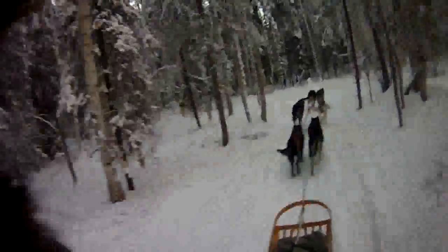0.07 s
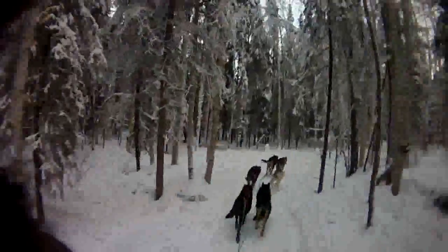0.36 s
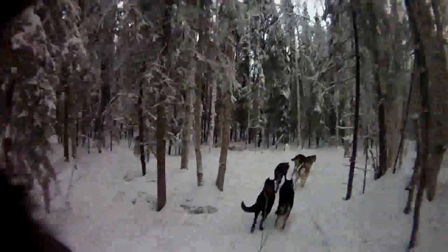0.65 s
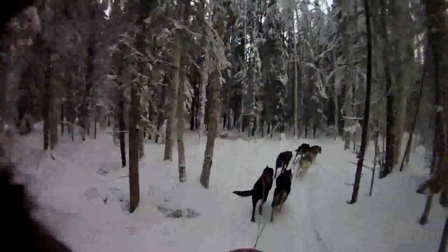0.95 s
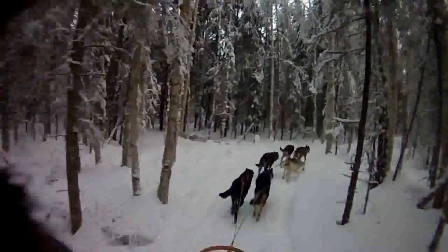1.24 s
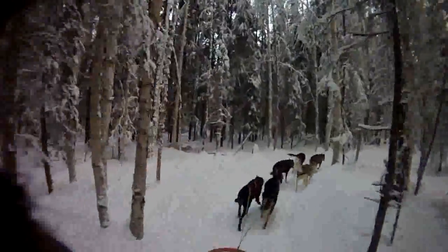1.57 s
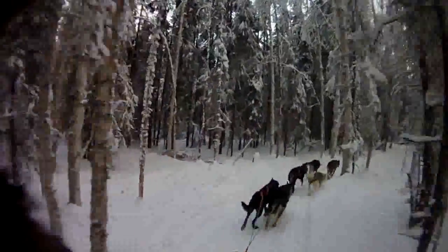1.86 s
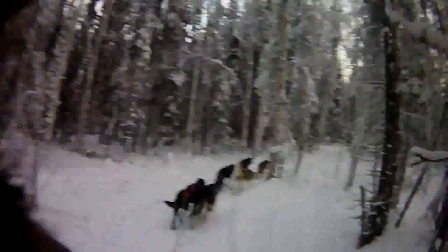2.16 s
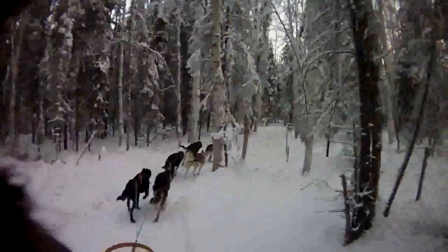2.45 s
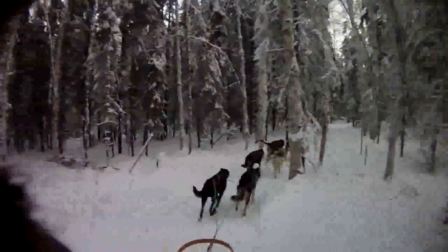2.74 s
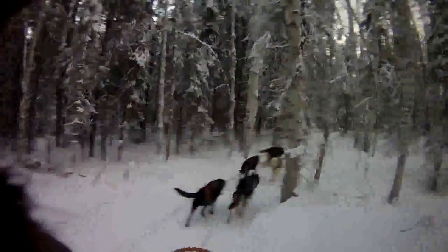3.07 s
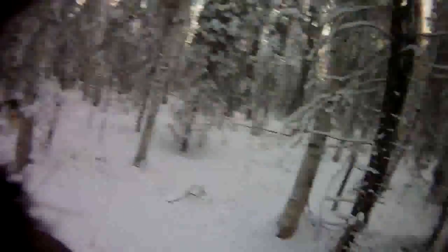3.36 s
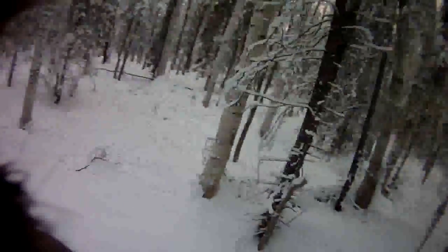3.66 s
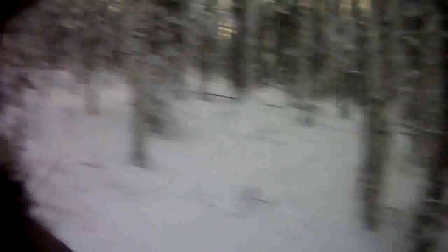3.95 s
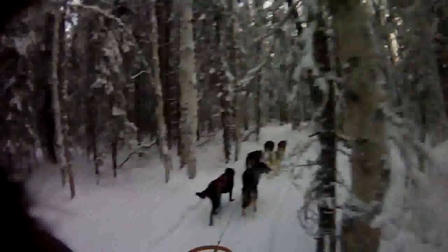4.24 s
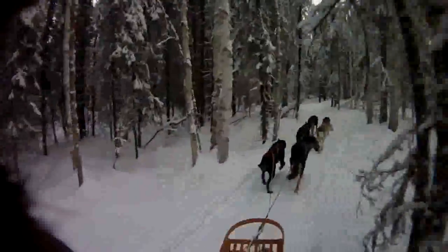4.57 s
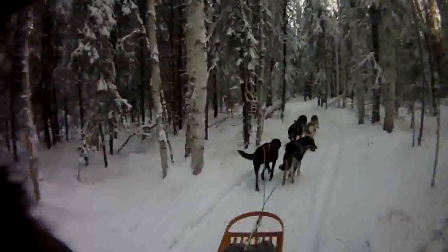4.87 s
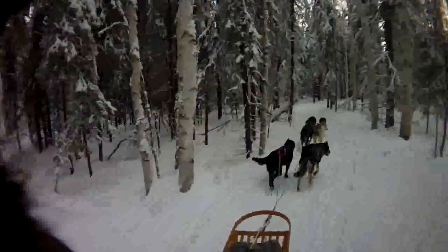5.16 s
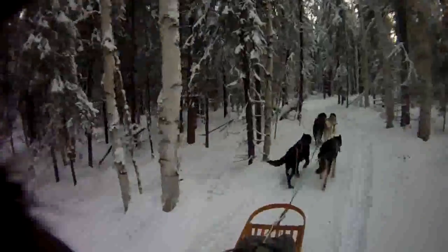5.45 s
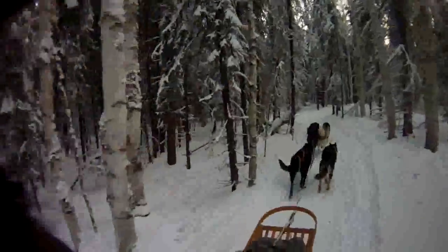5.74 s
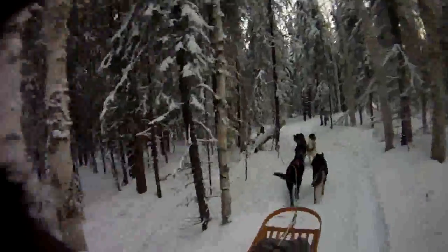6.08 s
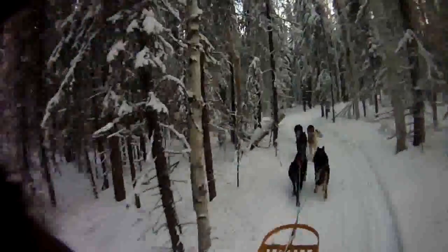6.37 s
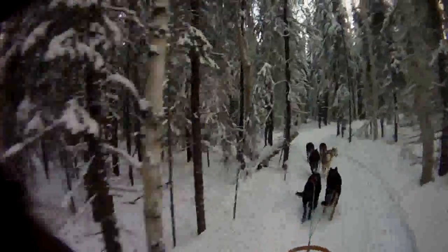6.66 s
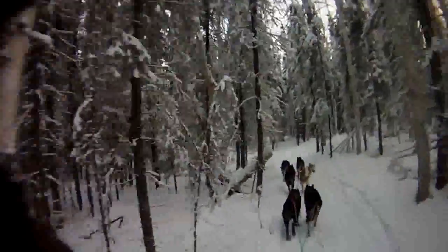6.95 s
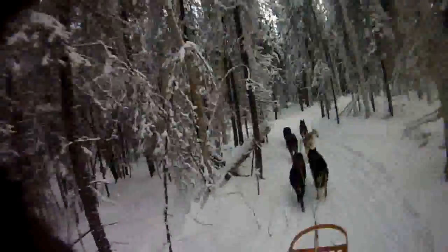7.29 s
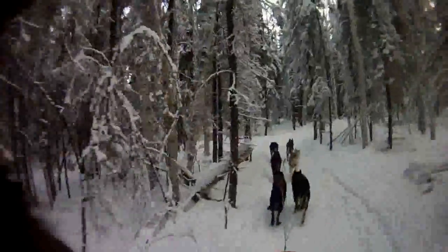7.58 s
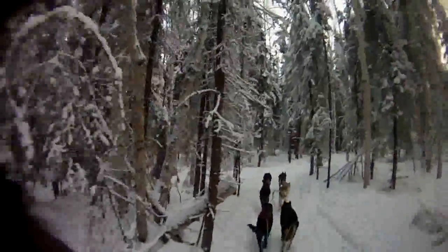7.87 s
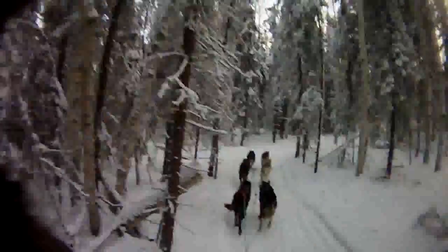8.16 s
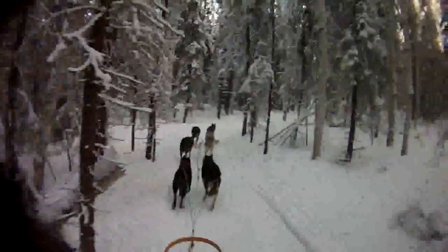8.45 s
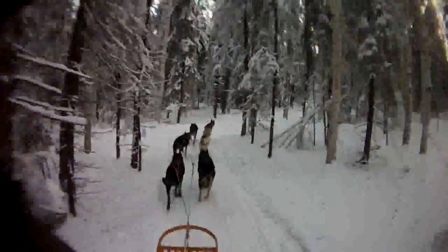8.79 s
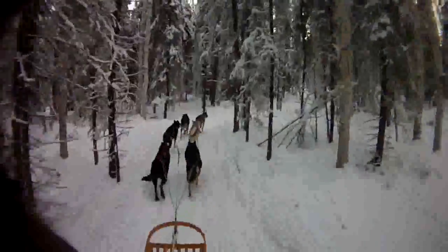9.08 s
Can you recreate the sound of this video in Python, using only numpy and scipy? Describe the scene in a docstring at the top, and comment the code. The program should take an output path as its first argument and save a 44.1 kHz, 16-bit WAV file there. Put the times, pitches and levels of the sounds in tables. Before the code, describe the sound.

Cloth brushes briefly against the microphone, then sled runners grind and hiss steadily over packed snow. The wooden frame rumbles and knocks dully over bumps, crust crunches and ice specks tick on the microphone. Past the middle a joint squeaks a few times, later a loose strut clacks, and a runner digs in with a loud scrape at the very end. The sound is slightly muffled, heard from the driver's place.

```python
"""Dog sled on a forest trail

Heard from the driver's place, through a closed camera housing. Runners grind over packed snow:
the frame rumbles and knocks, grains hiss, crust crunches, a joint squeaks and a loose strut clacks.
Cloth brushes the housing at the start and ice specks tick on it along the way.
At the end a runner digs into hard snow with a loud scrape."""
import sys
import numpy as np
from scipy import signal
from scipy.fft import rfft, irfft, next_fast_len
from scipy.io import wavfile
from scipy.ndimage import map_coordinates

SR = 44100
rng = np.random.default_rng(int(sys.argv[2]) if len(sys.argv) > 2 else 0)


def waveform_to_disk(signal):
    """Save audio, clipped to [-1, 1], as 16-bit WAV at the path in sys.argv[1]."""
    frames = np.transpose(np.atleast_2d(signal))
    scaled = np.clip(frames, -1, 1) * 32767
    samples = np.round(scaled).astype(np.int16)
    wavfile.write(sys.argv[1], SR, samples)


N = 411012
TIME = np.arange(N) / SR

# Slow fader rides for the layers of the runners: time_s, level_db
DRONE_LEVELS = [(0.0, -44.5), (0.64, -49), (1.38, -45), (2.27, -50), (2.73, -49), (3.03, -46.5),
                (3.95, -44), (5.33, -46.5), (6.14, -43.5), (6.45, -46.5), (6.68, -44.5), (6.83, -41.5),
                (7.31, -48), (8.64, -49), (8.79, -37), (9.15, -49.5)]
GRIND_LEVELS = [(0.0, -44.5), (0.64, -45.5), (1.04, -45.5), (1.32, -46.5), (2.7, -47), (3.11, -47.5),
                (4.23, -44.5), (5.27, -49.5), (6.39, -47), (6.8, -44), (6.98, -47), (7.24, -48),
                (8.08, -46), (8.46, -48.5), (9.02, -48), (9.15, -45)]
HISS_LEVELS = [(0.35, -55), (0.47, -55.5), (0.96, -53.5), (1.82, -55.5), (3.34, -55.5), (3.49, -58),
               (3.75, -56), (4.54, -49), (4.91, -49), (5.23, -51.5), (6.6, -52.5), (6.87, -48), (7.14, -51),
               (8.02, -54.5), (8.19, -52), (9.15, -54)]
JOSTLE_LEVELS = [(0.0, -50.5), (0.57, -48), (2.88, -52.5), (3.03, -49.5), (3.94, -55), (4.59, -49.5),
                 (5.11, -55), (5.61, -48), (5.92, -52), (8.44, -52.5), (8.75, -44.5), (9.32, -43)]
# Ruts press the runners down (+), crests lighten them (-): centre_s, swell_db, half_length_s
RUTS = [(0.52, -4.5, 0.044), (1.08, 0.5, 0.033), (1.6, 4.5, 0.039), (1.755, -6, 0.027), (1.96, 5.5, 0.046),
        (2.06, 0.5, 0.034), (2.22, 2, 0.035), (2.33, -3, 0.06), (2.57, 6, 0.038), (2.72, 6, 0.018),
        (3.14, -3, 0.067), (3.384, 4, 0.023), (3.59, -5, 0.047), (3.73, 1, 0.069), (4.48, -2.5, 0.052),
        (4.576, 3, 0.028), (5.1, 7.5, 0.015), (5.426, 6.5, 0.013), (6.23, 4.5, 0.041), (6.77, -6, 0.024),
        (6.88, 3, 0.067), (7.99, 1.5, 0.062), (8.21, 3, 0.015), (8.53, -4, 0.046)]
# Soft drifts that swell the hiss: centre_s, swell_db, half_length_s
DRIFTS = [(0.37, 1.5, 0.045), (1.57, 5, 0.022), (2.147, 4, 0.035), (2.658, 3.5, 0.05), (3.217, 4, 0.034),
          (3.315, 3.5, 0.03), (4.235, 2.5, 0.038), (4.436, 1.5, 0.04), (4.603, 5.5, 0.035),
          (4.68, 3, 0.032), (5.6, 2.2, 0.053), (7.23, 3.5, 0.022), (7.05, -0.5, 0.035), (8.06, 4.5, 0.045)]
# The hardest bumps through the frame: start_s, level_db, pitch_hz, t60_s
KNOCKS = [(0.405, -25.5, 393, 0.031), (0.435, -29, 550, 0.018), (1.522, -31, 580, 0.022),
          (1.693, -31, 300, 0.016), (1.722, -29, 560, 0.013), (1.884, -31, 630, 0.03),
          (1.944, -25.5, 430, 0.046), (2.045, -24, 472, 0.037), (2.146, -27, 240, 0.023),
          (2.432, -24, 242, 0.017), (2.448, -27, 346, 0.038), (2.541, -24.5, 280, 0.077),
          (2.597, -23.5, 336, 0.016), (3.68, -23.5, 222, 0.027), (3.701, -24.5, 525, 0.022),
          (3.941, -25.5, 237, 0.039), (4.001, -24.5, 507, 0.019), (4.078, -35, 226, 0.024),
          (5.112, -14, 397, 0.0046), (6.038, -41, 273, 0.033), (6.687, -35, 72, 0.084),
          (6.69, -23, 233, 0.071), (6.694, -23, 380, 0.044), (6.867, -31.5, 340, 0.1),
          (6.931, -23, 252, 0.04), (6.936, -26, 379, 0.088), (6.99, -28.5, 584, 0.051),
          (7.424, -14, 260, 0.019), (7.479, -22, 447, 0.013), (7.836, -29, 565, 0.018),
          (8.017, -23, 610, 0.019), (8.04, -21, 572, 0.026), (8.154, -21.5, 527, 0.015),
          (8.201, -18.5, 560, 0.013), (8.272, -28, 202, 0.028), (8.369, -29.5, 334, 0.12),
          (8.598, -27, 127, 0.09), (8.812, -26, 258, 0.059)]
# Big lumps of crust crushed under a runner: start_s, level_db, length_s
CRUNCHES = [(1.057, -51, 0.0069), (1.263, -40.5, 0.002), (1.311, -51.5, 0.006), (2.538, -51.5, 0.037),
            (2.893, -54, 0.025), (3.095, -46.5, 0.0039), (3.937, -54.5, 0.029), (4.075, -47.5, 0.0059),
            (4.43, -55, 0.022), (3.315, -55, 0.012), (5.075, -52, 0.032), (5.284, -51.5, 0.024),
            (5.447, -49, 0.01), (5.823, -52, 0.006), (6.585, -45.5, 0.0059), (6.678, -47, 0.018),
            (6.702, -54, 0.032), (6.932, -40, 0.006), (7.42, -50.5, 0.0065), (8.679, -50, 0.025),
            (8.71, -57.5, 0.22), (8.745, -51.5, 0.0072), (9.122, -46.5, 0.0048)]
# Dry cracks of the wooden frame: start_s, level_db, length_s
WOOD_CRACKS = [(6.0285, -52, 0.0037), (6.0325, -37, 0.0046), (6.037, -52, 0.0081), (6.931, -37, 0.0021),
               (6.686, -50, 0.02), (8.365, -48, 0.0064)]
# Squeaks and groans of a joint: start_s, length_s, start_hz, end_hz, peak_db
SQUEAKS = [(5.866, 0.031, 650, 570, -35.5), (5.874, 0.11, 268.3, 277, -43), (5.903, 0.049, 600, 567, -42.5),
           (6.025, 0.17, 275, 261.5, -43.5), (6.367, 0.096, 612, 448, -36.5),
           (6.557, 0.14, 488, 492, -37.5)]
# A loose strut hitting the frame: start_s, level_db
CLACKS = [(8.365, -31.5), (8.367, -37), (8.3725, -39)]
# Fader ride of the cloth on the housing: time_s, level_db
BRUSH_LEVELS = [(0.0, -38), (0.034, -46.5), (0.13, -39.5), (0.155, -38.5), (0.172, -31.5), (0.193, -31),
                (0.21, -29.5), (0.228, -36), (0.245, -23), (0.255, -27.5), (0.265, -26), (0.285, -47)]
# Ice specks hitting the housing: start_s, level_db
SPECKS = [(0.2614, -14.5), (3.42, -27), (4.0968, -29.5), (4.2238, -24.5), (6.264, -26), (6.480, -26),
          (6.932, -33.5), (7.06, -29), (7.295, -33), (7.297, -27.5)]
# Ringing modes of the wooden strut and the housing: pitch_hz, level_db, t60_s
STRUT_MODES = [(1460, 0.5, 0.023), (1790, -9, 0.033), (2640, -3, 0.027), (2950, -3.5, 0.073),
               (4350, -7, 0.018)]
HOUSING_MODES = [(1910, 2, 0.0056), (3250, 4, 0.0034), (4850, 5, 0.0025), (6050, 6, 0.003),
                 (6730, -4.5, 0.0084)]
# Tone colour of each noise: frequency_hz, gain_db
BASKET_EQ = [(60, -39), (130, -6.5), (190, -3.5), (275, -1), (350, -5.5), (460, -22.5), (800, -55),
             (1500, -92.5)]  # low drone of the sled's basket
FRAME_EQ = [(120, -22.5), (300, -1.5), (420, 1.5), (500, 1.5), (620, 0.5), (760, -9), (900, -17),
            (1200, -34), (2000, -99.5)]  # low-mid grind
JOSTLE_EQ = [(8, 2), (22, -2.5), (60, 1), (120, 0), (200, -4.5), (400, -69.5)]  # deep sway of the ride
SNOW_EQ = [(400, -11), (900, -10.5), (1100, -2), (1400, 3.5), (2100, 4), (2500, 3), (3100, 3.5),
           (3700, 0.5), (4500, -1.1), (5500, -13), (6800, -12), (7700, -35), (8300, -67)]  # sliding grains
POWDER_EQ = [(3000, -29), (4800, 4.5), (6500, 12), (7400, -10), (8300, -45)]  # fine, bright spray
WOOD_EQ = [(500, -5.5), (1000, -19), (1450, -1.5), (2000, 3.5), (2600, 2.5), (3020, 2), (3400, -3.5),
           (4700, -12), (5700, -16), (8000, -46)]  # dry snap
SCRAPE_EQ = [(30, -23), (130, -8), (220, 3), (310, 2), (420, 1), (620, -6.5), (900, -25.5), (1300, -16),
             (2200, -17.5), (3550, -10), (4600, -22.5), (6000, -29.5), (7500, -68)]  # an edge in hard snow
LIGHT_CLOTH_EQ = [(300, -18), (700, -4), (1050, -16), (1650, -10.5), (2080, -4), (2400, -10), (2900, -2),
                  (3850, -6), (4400, -1.5), (5400, -2.5), (5950, 2), (6650, -7.5), (7100, -6.5),
                  (7700, -19), (8600, -30)]
PRESSED_CLOTH_EQ = [(150, -16), (500, 0.5), (1600, -10.5), (2080, 2), (2450, -6), (3300, -0.5),
                    (4300, -5.5), (5000, -1.5), (6600, -1.5), (7600, -12), (8600, -21)]
HIGH_HISS_EQ = [(1000, -8), (3000, -5), (5000, 20.5), (6500, -15.5), (7650, 21), (8300, -51)]  # thin hiss with peaks near 5 and 7.6 kHz
FAINT_HISS_EQ = [(30, 26), (200, -8), (450, -33), (800, 11.5), (2500, -22.5), (5000, -2), (7500, 15.5),
                 (8500, -36)]  # very faint hiss, separate in each channel


def amp(db):
    """Decibels to gain."""
    return 10 ** (np.asarray(db) / 20)


def unit(x):
    """Scale to rms 1."""
    return x / np.sqrt(np.mean(x ** 2) + 1e-20)


def fader(rows):
    """A level in dB for every sample, from rows of time_s, level_db."""
    return np.interp(TIME, *np.transpose(rows))


def wobble(knots_per_s, size=N):
    """A smooth random curve around zero."""
    return map_coordinates(rng.standard_normal(4096), [TIME[:size] * knots_per_s], mode="wrap")


def swells(rows):
    """Bell-shaped bumps of level in dB."""
    return sum(db * np.exp(-((TIME - centre) / half_length) ** 2) for centre, db, half_length in rows)


def coloured(x, eq):
    """Shape x with a minimum-phase EQ, so nothing rings ahead of a hit."""
    size = 2 * next_fast_len(N // 2 + 8192)
    hz, db = np.transpose(eq)
    gain = amp(np.interp(np.log(np.fft.rfftfreq(size, 1 / SR) + 1), np.log(hz), db))
    cepstrum = irfft(np.log(gain), size)
    cepstrum[1:size // 2] *= 2
    cepstrum[size // 2 + 1:] = 0
    return irfft(rfft(x, size) * np.exp(rfft(cepstrum)), size)[:N]


def noise(eq):
    """Smooth coloured noise at rms 1."""
    return unit(coloured(rng.standard_normal(N), eq))


def friction(eq, slips_per_s, rush, spread_db=0):
    """Tiny random slips over a smooth rush, coloured by the body they shake; rms 1."""
    slips = (rng.random(N) < slips_per_s / SR) * rng.choice([-1, 1], N)
    sizes = amp(spread_db * np.clip(rng.standard_normal(N), -2, 2))
    return unit(coloured(unit(slips * sizes) + rush * rng.standard_normal(N), eq))


def runners():
    """Packed snow shakes frame and basket; loose grains hiss, spray and crackle along the edges."""
    rut_db = swells(RUTS)
    load = wobble(20)  # small ripples shift the weight on the runners
    drone_db = fader(DRONE_LEVELS) + rut_db + 0.37 * load
    drone = amp(drone_db) * friction(BASKET_EQ, slips_per_s=450, rush=0.69, spread_db=4)
    chatter_db = 1.4 * wobble(60)
    grind_db = fader(GRIND_LEVELS) + 1.5 + rut_db + 0.53 * load + chatter_db
    grind = amp(grind_db) * friction(FRAME_EQ, slips_per_s=480, rush=0.62)

    glide_db = fader(HISS_LEVELS) + swells(DRIFTS)
    flutter_db = 1.1 * wobble(70)
    hiss_db = glide_db + 0.46 + 0.93 * load + flutter_db
    hiss = amp(hiss_db) * friction(SNOW_EQ, slips_per_s=2500, rush=1)
    # Harder gliding breaks more crystals: powder and crackle grow faster than the hiss.
    spray_db = glide_db + 0.4 * (glide_db - glide_db.mean())
    puff_db = 1.5 * wobble(18)
    powder = amp(spray_db - 21 + puff_db) * noise(POWDER_EQ)
    clumps = unit(np.clip(wobble(50), 0, 2) ** 2)  # coarse crystals break in clusters and ring the wood
    crystals = friction(WOOD_EQ, slips_per_s=660, rush=0.15, spread_db=2)
    crackle = amp(spray_db - 9.5) * clumps * crystals

    jostle = amp(fader(JOSTLE_LEVELS) + 3 + 1.6 * load) * noise(JOSTLE_EQ)
    fade_in = amp(np.interp(TIME, [0.31, 0.345], [-22, 0]))  # the hiss fades in just after the brush
    return drone + grind + jostle + fade_in * (hiss + powder + crackle)


def frame_knocks():
    """Each bump gives the damped frame a short, dull ring with a weaker upper mode."""
    track, t = np.zeros(N), np.arange(SR // 5) / SR
    attack = 1 - np.exp(-t / 0.00081)
    for start, db, hz, t60 in KNOCKS:
        body = np.cos(2 * np.pi * hz * t)
        upper = 0.5 * np.cos(2 * np.pi * 1.617 * hz * t) * amp(-30 * t / t60)
        add(track, start, amp(db - 60 * t / t60) * (body + upper) * attack)
    return signal.sosfilt(signal.butter(9, 750, fs=SR, output="sos"), track)


def edge_scrape(dug_in_s=9.256, attack_db_per_s=390, growth_db_per_s=49):
    """A runner's edge digs quickly into hard snow, then chatters ever harder."""
    t = TIME - dug_in_s
    swell_db = np.minimum(attack_db_per_s * t, growth_db_per_s * t)
    level_db = -25.5 + swell_db + 0.46 * wobble(90)
    return amp(level_db) * friction(SCRAPE_EQ, slips_per_s=1300, rush=0.7, spread_db=1.5)


def fractures(bursts, eq):
    """Crust or wood gives way in sharp bursts of tiny breaks."""
    force, t = np.zeros(N), np.arange(SR // 4) / SR
    attack = 1 - np.exp(-t / 0.0011)
    for start, db, length in bursts:
        add(force, start, amp(db + 8) * attack * np.exp(-(t / length) ** 2))
    return force * friction(eq, slips_per_s=2700, rush=0.85, spread_db=0.5)


def crust_crunches(crumbs_per_s=3.6, crumb_db=-53.5, crumb_s=0.0041):
    """The runners crush big lumps of crust and meet small crumbs by chance."""
    waits = rng.exponential(1, size=64) / crumbs_per_s
    crumbs = [(start, crumb_db, crumb_s) for start in np.cumsum(waits)]
    return fractures(list(CRUNCHES) + crumbs, SNOW_EQ)


def joint_squeaks():
    """A loaded joint sticks and slips in short, slightly unsteady gliding tones."""
    track, waver = np.zeros(N), 1 + 0.0065 * wobble(130)
    for start, length, start_hz, end_hz, db in SQUEAKS:
        progress = np.clip((TIME - start) / length, 0, 1)
        hz = (start_hz + (end_hz - start_hz) * progress) * waver
        track += amp(db) * np.sin(np.pi * progress) * np.sin(2 * np.pi * np.cumsum(hz) / SR)
    return track


def strut_clacks(buzz_rad=0.85):
    """A strut hits twice, rebounds once and rings briefly, buzzing in its loose lashing."""
    track, t = np.zeros(N), np.arange(SR // 8) / SR
    attack = 1 - np.exp(-t / 0.00045)
    for start, db in CLACKS:
        for hz, mode_db, t60 in STRUT_MODES:
            phase = 2 * np.pi * hz * t + buzz_rad * wobble(400, size=len(t))
            add(track, start, amp(db + mode_db - 60 * t / t60) * np.sin(phase) * attack)
    return track


def cloth_brush(press_s=0.22, release_s=0.2605, release_db_per_s=501, thump_hz=47.2, thump_t60_s=0.087):
    """Cloth rasps over the hollow housing in two pushes; the harder second one rocks it and lets go."""
    light = friction(LIGHT_CLOTH_EQ, slips_per_s=5000, rush=0.49, spread_db=1.5)
    pressed = friction(PRESSED_CLOTH_EQ, slips_per_s=2400, rush=0.73, spread_db=2.5)
    t = np.maximum(TIME - press_s, 0)
    pressure = np.clip(t / 0.011, 0, 1)
    rasp = np.sqrt(pressure) * pressed + np.sqrt(1 - pressure) * light
    snag_db = 1.6 * wobble(400)  # the cloth catches and slips
    release_db = -release_db_per_s * np.maximum(TIME - release_s, 0)
    level_db = fader(BRUSH_LEVELS) + 0.5 + release_db + snag_db
    thump = amp(-21.5 - 60 * t / thump_t60_s) * np.sin(2 * np.pi * thump_hz * t)
    return amp(level_db) * rasp - thump


def ice_specks(bounce_s=0.00069, bounce_db=-10.5):
    """Hard bits snap thinly on the small housing, ring it for a moment and bounce once."""
    track, t = np.zeros(N), np.arange(SR // 50) / SR
    attack = 1 - np.exp(-t / 0.000093)
    for start, db in SPECKS:
        for delay, loss_db in ((0, 0), (bounce_s, bounce_db)):
            ring = sum(amp(mode_db - 60 * t / t60) * np.sin(2 * np.pi * hz * rng.normal(1, 0.017) * t)
                       for hz, mode_db, t60 in HOUSING_MODES)
            shatter = rng.standard_normal(len(t)) * amp(-60 * t / 0.0087)
            click = (ring + shatter) * attack
            add(track, start + delay, amp(db + loss_db) * click / np.abs(click).max())
    return signal.sosfilt(signal.butter(10, 7800, fs=SR, output="sos"), track)


def high_hiss():
    """A thin hiss fades up after the cloth brush and holds steady under the ride."""
    return amp(np.interp(TIME, [0.3, 0.4], [-81, -69])) * noise(HIGH_HISS_EQ)


def add(track, start_s, sound):
    """Mix a sound into the track at start_s."""
    part = track[max(round(start_s * SR), 0):][:len(sound)]
    part += sound[:len(part)]


def scene():
    """Sled, housing noises and a thin high hiss, mixed dead centre."""
    sled = runners() + frame_knocks() + strut_clacks() + crust_crunches()
    sled += fractures(WOOD_CRACKS, WOOD_EQ) + joint_squeaks() + edge_scrape()
    mono = sled + ice_specks() + cloth_brush() + high_hiss()
    return np.array([mono, mono])


def record(dry):
    """Each channel gains a very faint hiss of its own; the camera cuts the top off steeply."""
    hiss_db, cutoff_hz = -74, 8600
    faint_hiss = amp(hiss_db) * np.array([noise(FAINT_HISS_EQ) for _ in dry])
    size = next_fast_len(N + SR // 2)
    lowpass = 1 / (1 + (np.fft.rfftfreq(size, 1 / SR) / cutoff_hz) ** 60)
    return irfft(rfft(dry + faint_hiss, size) * lowpass, size)[:, :N]


dry = scene()
out = record(dry)
waveform_to_disk(out)
```